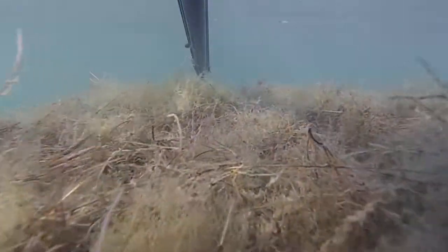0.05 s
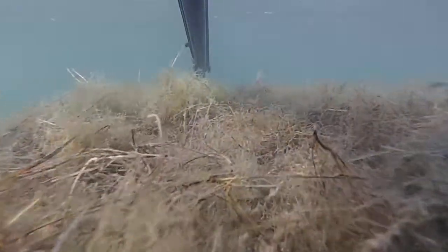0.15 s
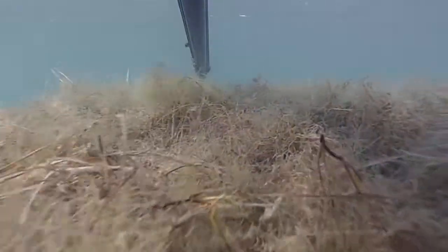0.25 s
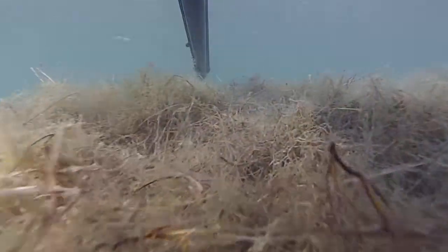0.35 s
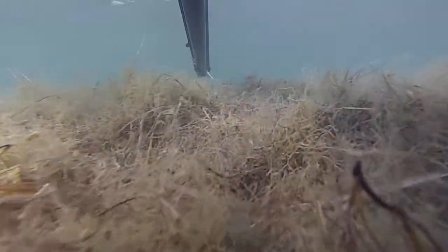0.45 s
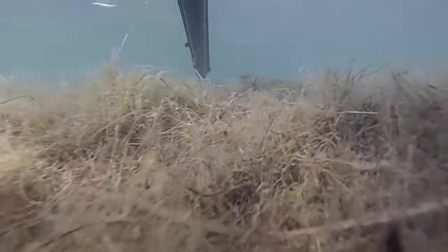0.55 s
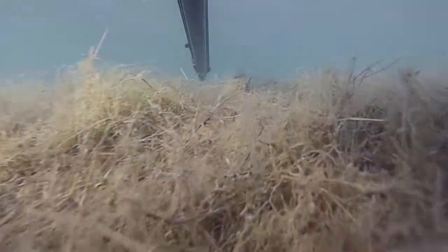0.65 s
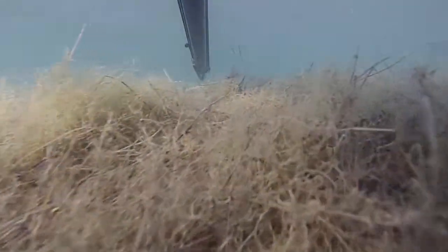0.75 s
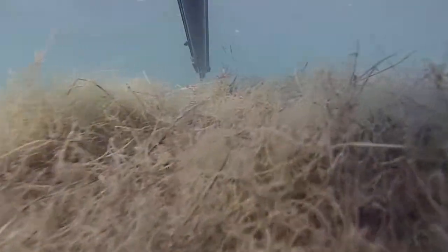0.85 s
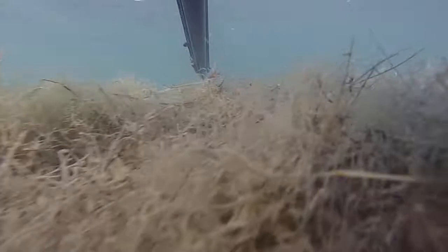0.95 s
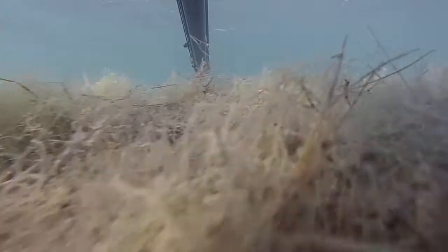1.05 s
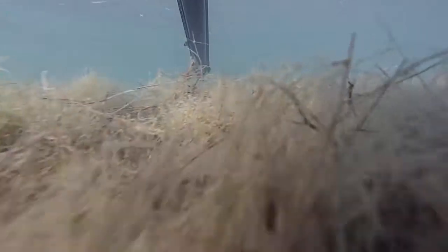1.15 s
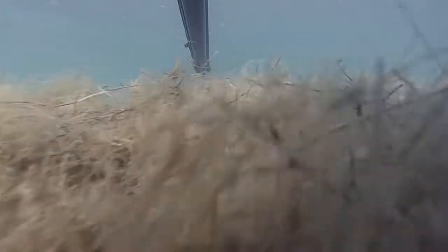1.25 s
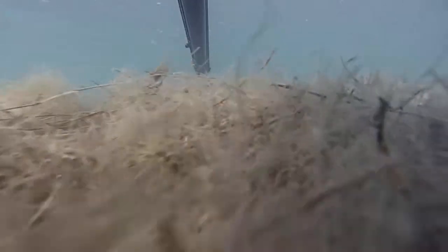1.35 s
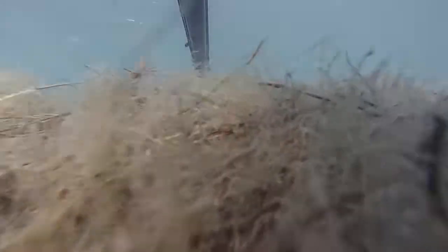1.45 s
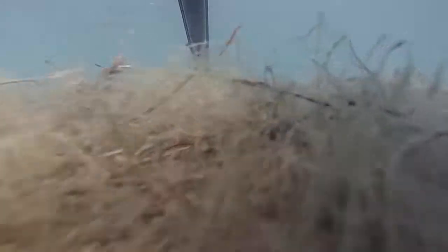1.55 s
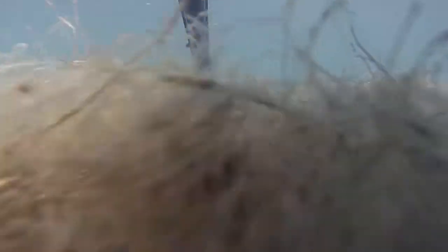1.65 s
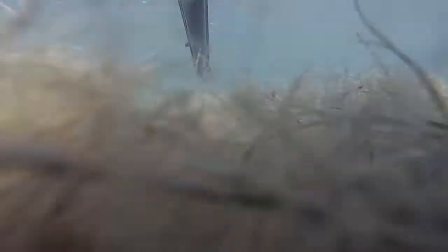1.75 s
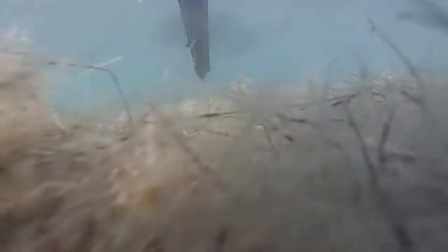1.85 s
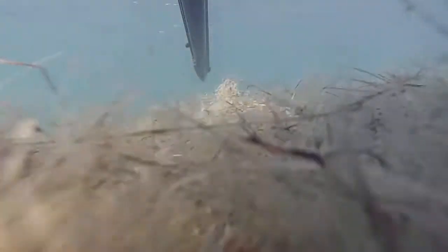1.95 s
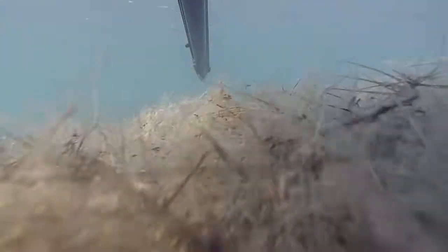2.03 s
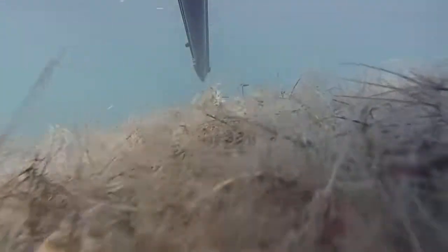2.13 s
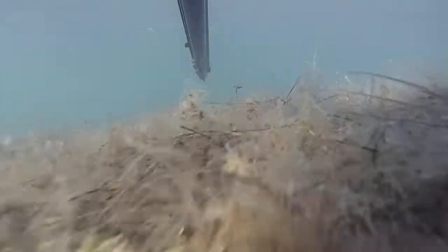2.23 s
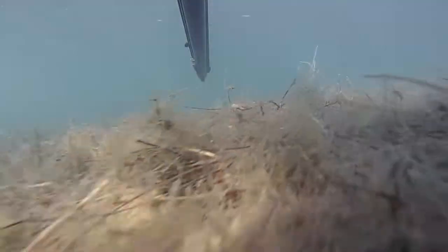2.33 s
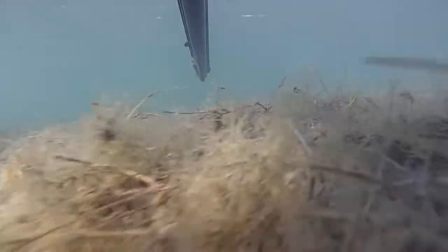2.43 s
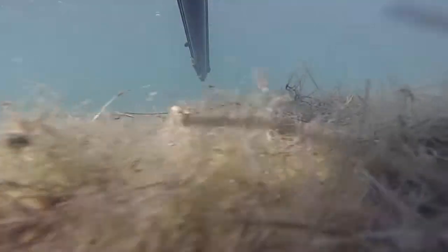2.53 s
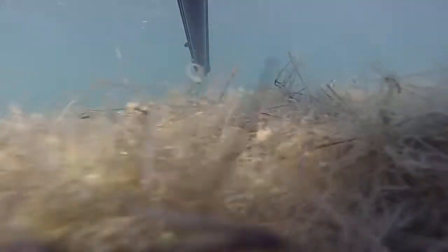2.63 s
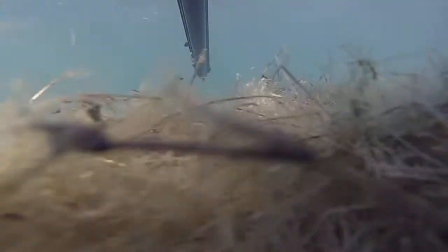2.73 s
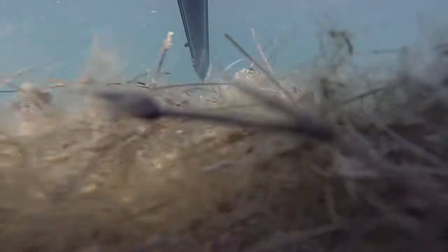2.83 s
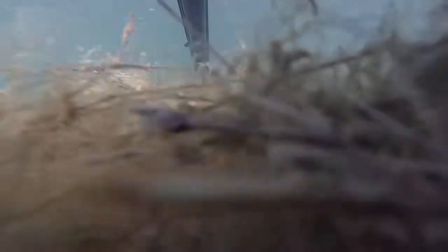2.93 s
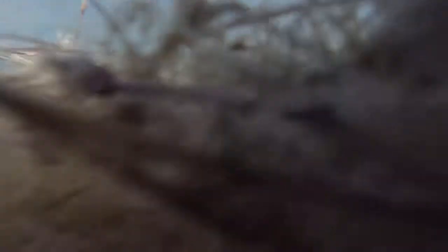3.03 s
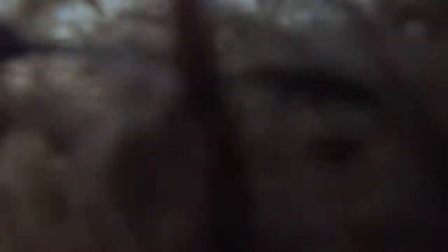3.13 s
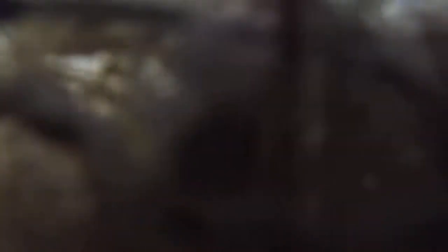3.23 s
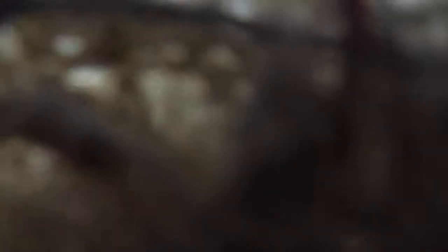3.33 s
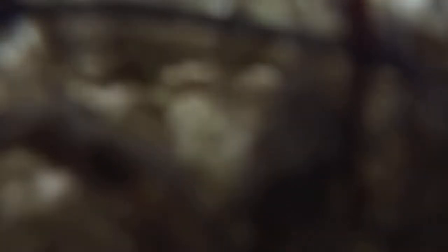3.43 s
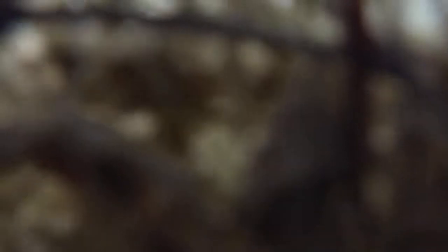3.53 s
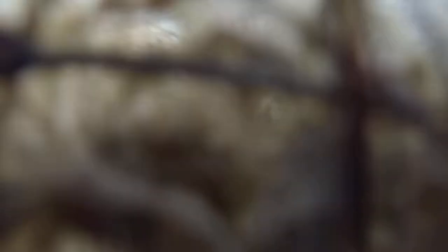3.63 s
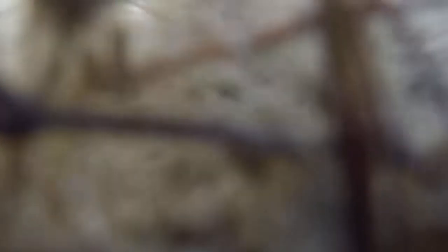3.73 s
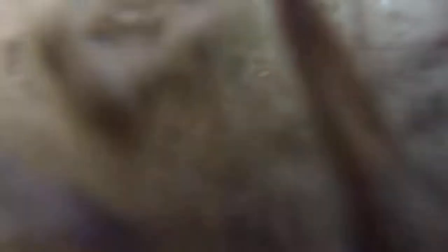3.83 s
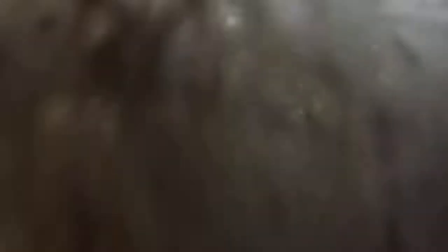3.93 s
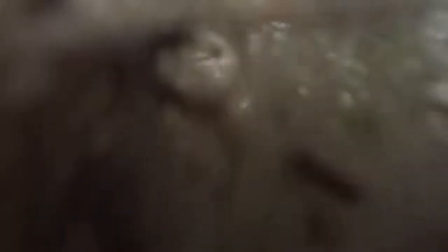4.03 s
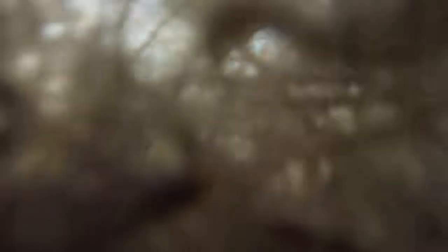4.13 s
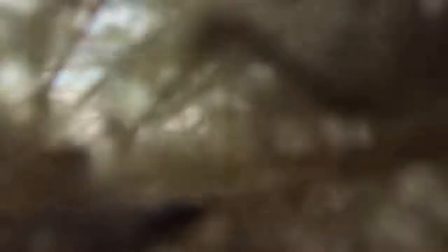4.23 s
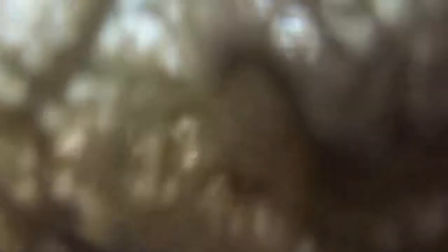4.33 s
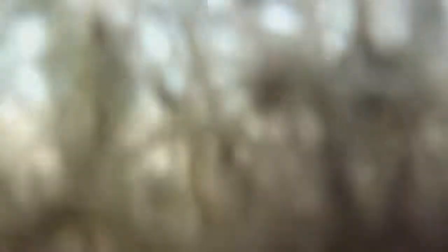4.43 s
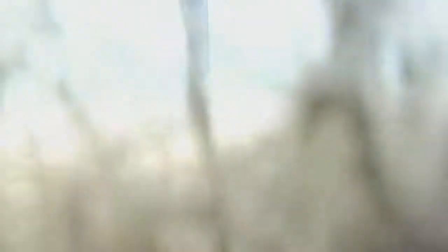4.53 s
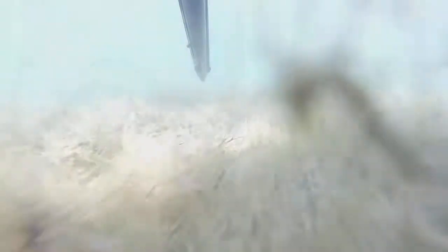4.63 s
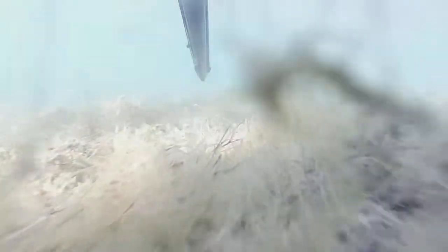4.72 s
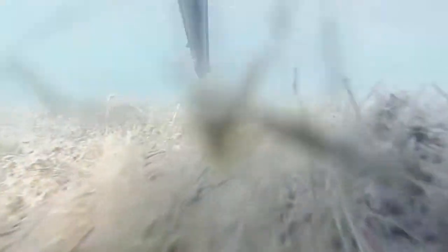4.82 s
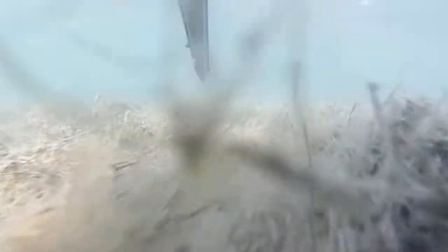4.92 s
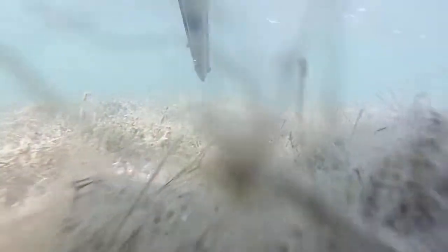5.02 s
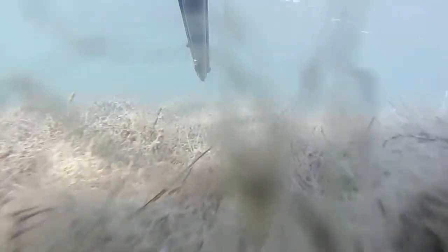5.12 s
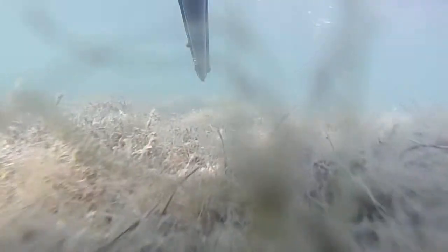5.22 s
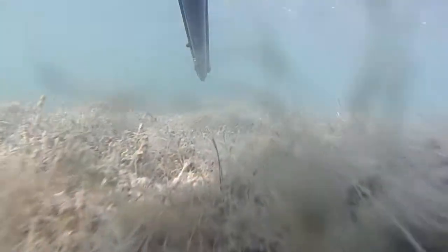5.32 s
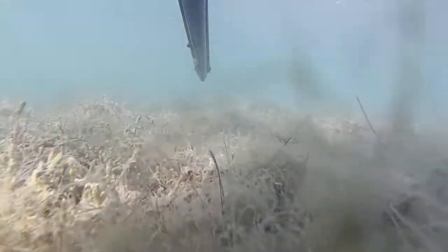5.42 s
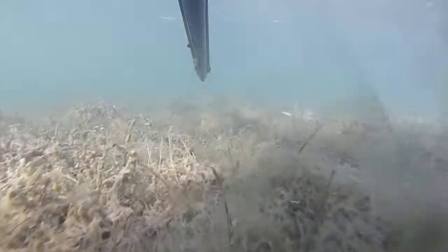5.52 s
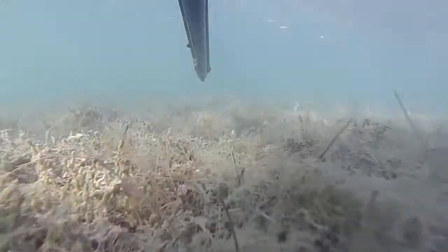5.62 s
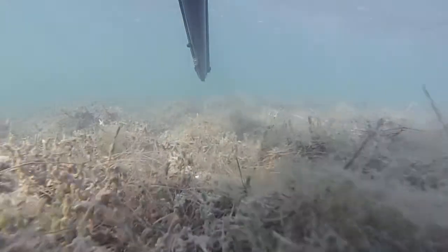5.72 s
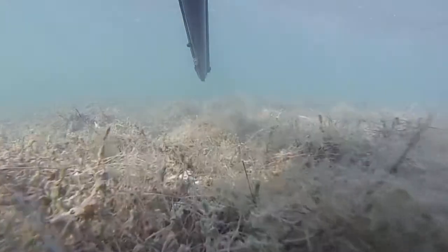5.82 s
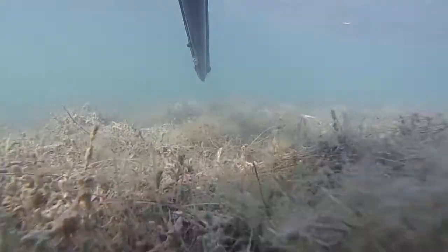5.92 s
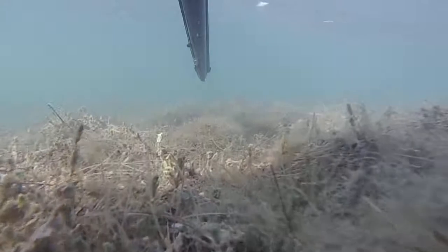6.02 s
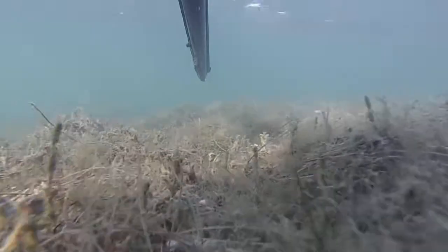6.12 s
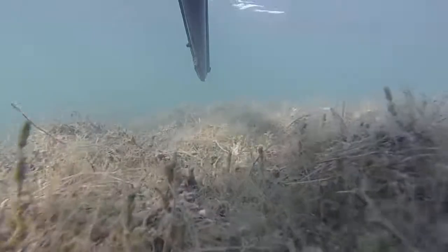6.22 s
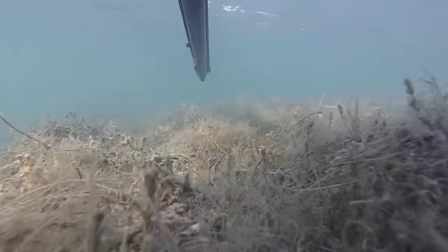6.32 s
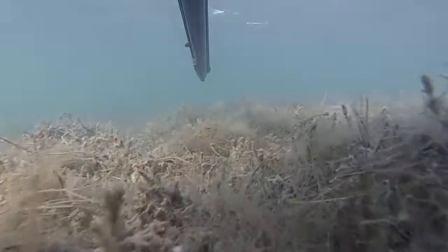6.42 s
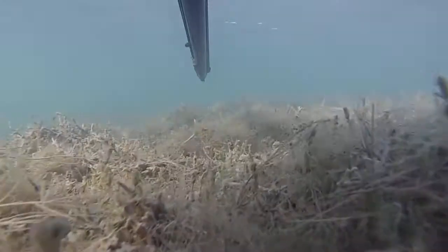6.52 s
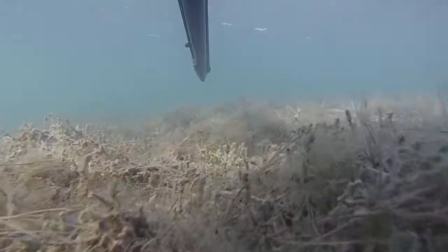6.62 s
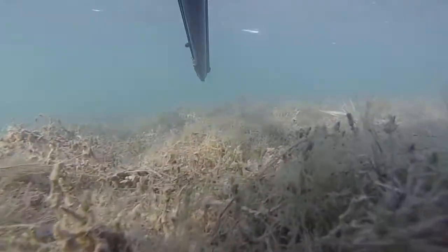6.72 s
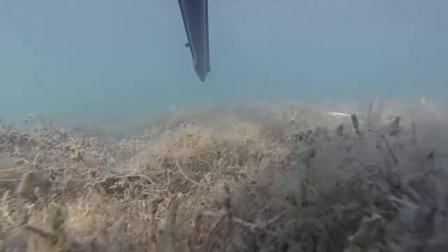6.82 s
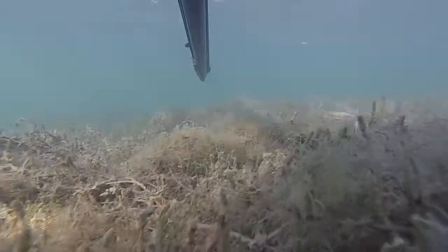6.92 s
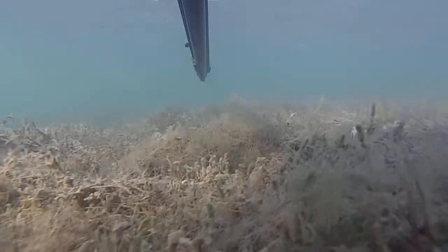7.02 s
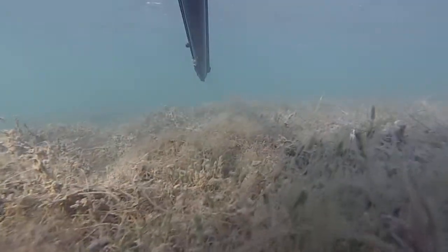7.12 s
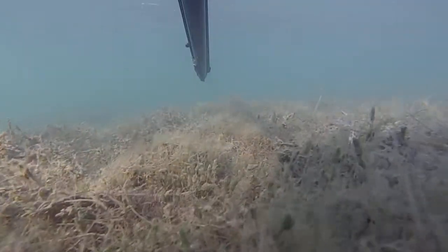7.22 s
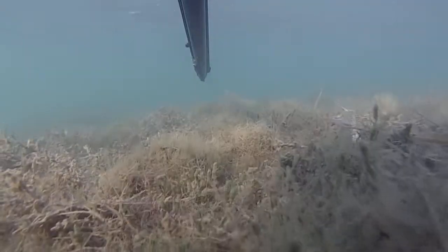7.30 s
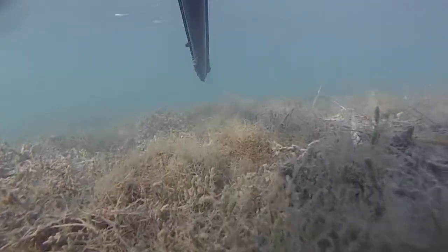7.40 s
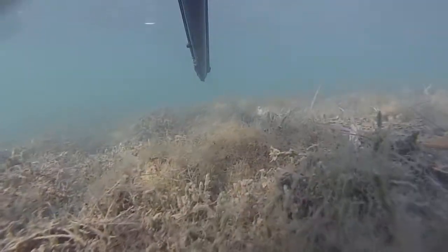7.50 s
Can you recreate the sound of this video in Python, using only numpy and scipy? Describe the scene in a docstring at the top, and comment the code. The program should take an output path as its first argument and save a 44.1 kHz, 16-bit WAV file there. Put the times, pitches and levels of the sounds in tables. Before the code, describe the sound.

Inside a camera housing pushed through shallow-water seaweed: faint fizzing bubbles and a humming drag, then a sharp knock. Low judders lead into dense rubbing, crackling twigs, hard knocks and dull thumps, heaviest around four seconds. It thins to a quiet low drag, then a bump rattles the frame near the end. The close, enclosed microphone makes everything muffled.

```python
"""A camera housing on a frame is pushed through seaweed in shallow water, heard from inside the housing.
Fronds, stalks and grit excite the shell by tiny slips and impulses; flow and blows shake the mount. Stick-slip
tones make most squeaks and the judders. A few bubbles fizz and ping at the start. The frame hums and chatters
where it drags along the bed, and rattles and shudders after bumps."""
import sys
import numpy as np
from scipy import signal
from scipy.fft import rfft, irfft
from scipy.io import wavfile
from scipy.ndimage import uniform_filter1d

SR = 44100
rng = np.random.default_rng(int(sys.argv[2]) if len(sys.argv) > 2 else 0)


def to_wav(s):
    """Save 16-bit WAV."""
    ch = np.atleast_2d(s).T  # columns
    pcm = np.round(np.clip(ch, -1, 1) * 32767)  # PCM
    wavfile.write(sys.argv[1], SR, pcm.astype(np.int16))


N = 333396
TIME = np.arange(N) / SR
FIRM_DB = -42   # weed pressure of an ordinary clump

# transmission through the shell wall: [f/Hz, relative level/dB per Hz]
WALL_SPECTRUM = [(120, 7.5), (250, 0.5), (480, -2), (700, 3.5), (1020, -0.5), (1350, -2.5), (1600, -1),
                 (2200, -3.5), (2600, -13), (3050, -11), (3700, -5.5), (4050, -29), (4400, -57),
                 (6000, -50)]
# the shell's treble: [f/Hz, relative level/dB per Hz]
TREBLE_SPECTRUM = [(3000, -3), (4400, -4), (4950, 4), (5800, -2.5), (6250, -1.5), (7000, -7.5), (7600, -4),
                   (8600, -13), (11800, -13), (12600, -14), (15500, -41)]


def from_db(db):
    """Amplitude ratio of a level in dB."""
    return 10 ** (np.asarray(db) / 20)


def rms_one(x):
    """Scale to rms 1."""
    return x / np.sqrt(np.mean(x ** 2) + 1e-20)


def peak_one(x):
    """Scale to peak 1."""
    return x / (np.abs(x).max() + 1e-20)


def in_time(rows):
    """A curve of (t/s, value) at every sample."""
    t_s, value = np.transpose(rows)
    return np.interp(TIME, t_s, value)


def add(out, t_s, sound):
    """Mix a sound in at time t_s."""
    i = max(0, round(t_s * SR))
    out[i:i + len(sound)] += sound[:max(0, N - i)]


def swell(t_s, rise_s, fall_s):
    """Bell of height 1 at t_s, with a 1/e width for either side."""
    width_s = np.where(TIME < t_s, rise_s, fall_s)
    return np.exp(-np.minimum(((TIME - t_s) / width_s) ** 2, 60))


def drift(rate_hz):
    """Slow chance of spread 1: noise through two equal poles, run at SR / 40."""
    pole = np.exp(-80 * np.pi * rate_hz / SR)
    noise = rng.standard_normal(N // 40 + 2002)
    slow = signal.lfilter([1], [1, -2 * pole, pole * pole], noise)[2000:]
    return np.interp(np.arange(N) / 40, np.arange(len(slow)), rms_one(slow))


def cut(x, hz, kind, order=2):
    """Low-pass or high-pass."""
    sos = signal.butter(order, min(hz, SR / 2 - 1000), kind, fs=SR, output="sos")
    return signal.sosfilt(sos, x)


def response(spectrum, size=8192):
    """The causal (minimum-phase) impulse response of a body with this spectrum."""
    hz, db = np.transpose(spectrum)
    bins_hz = np.arange(size // 2 + 1) * SR / size
    log_gain = np.log(from_db(np.interp(np.log(bins_hz + 1), np.log(hz), db)))
    cepstrum = irfft(log_gain)[:size // 2]
    return irfft(np.exp(rfft(np.r_[cepstrum[0], 2 * cepstrum[1:]], size)))


def colour(x, spectrum):
    """Pass a steady excitation through a body; rms 1."""
    return rms_one(signal.oaconvolve(x, response(spectrum))[:N])


def evened(x, share, size):
    """Take out a share of a noise's slow swings in level; rms 1."""
    power = np.abs(uniform_filter1d(x ** 2, size=size)) + 1e-9
    return rms_one(x / power ** (share / 2))


def ringing(modes, size=8192):
    """Sum of decaying sines, one per mode."""
    t = TIME[:size]
    return sum(from_db(db - 60 * t / t60_s) * np.sin(2 * np.pi * hz * t) for hz, db, t60_s in modes)


def slips(per_s, spread_db):
    """Tiny stick-slip releases at random moments, a few much larger than the rest; rms 1."""
    sizes = from_db(spread_db * np.minimum(rng.exponential(1, N), 5))
    signed = sizes * rng.choice([-1, 1], N)
    return rms_one(signed * (rng.random(N) < per_s / SR))


def slip_phase(t_s, hz, glide_oct_per_s, wander_oct):
    """Phase of a wavering stick-slip tone that glides through its pitch at t_s."""
    octaves = glide_oct_per_s * np.clip(TIME - t_s, -.06, .06) + wander_oct
    return 2 * np.pi * np.cumsum(hz * 2 ** octaves) / SR


def shell_click(treble_db):
    """What one sharp impulse on the outside becomes inside the shell."""
    return response(WALL_SPECTRUM) + from_db(treble_db) * response(TREBLE_SPECTRUM)


def flow(current_db=-50.5):
    """Eddies keep the mount rocking gently; clinging weed tugs it onto its low resonances in uneven heaves."""
    # open-water current: [f/Hz, relative level/dB per Hz]
    current_spectrum = [(20, -11.5), (42, 8.5), (57, 1.5), (70, -0.5), (95, 0), (180, -17), (800, -88)]
    # rocking mount: [f/Hz, relative level/dB per Hz]
    rocking_spectrum = [(25, -21.5), (40, 2), (57, 11.5), (76, -4), (98, 1), (120, -5), (142, -12.5),
                        (175, -10), (260, -19.5), (700, -41.5), (2000, -97.5)]
    # tug of the weed, as rocking level: [t/s, level/dB]
    tug_db = [(1.35, -48), (1.5, -40), (1.82, -27.5), (2.1, -34.5), (2.35, -42.5), (2.95, -45), (3.13, -35),
              (3.45, -36), (3.95, -23.5), (4.2, -26), (4.65, -26.5), (4.85, -37), (5.2, -40.5),
              (5.75, -51.5)]
    current = from_db(current_db) * colour(rng.standard_normal(N), current_spectrum)
    rocking = evened(colour(rng.standard_normal(N), rocking_spectrum), share=0.89, size=8820)
    return current + from_db(in_time(tug_db)) * rocking


def snags(per_s, release_s):
    """Sudden bursts that die away; mean 1."""
    catches = np.abs(slips(per_s, spread_db=5.5))
    bursts = signal.lfilter([1], [1, -np.exp(-1 / (release_s * SR))], catches + 1e-12)
    return bursts / bursts.mean()


def rubbing(clump_db, snag_share):
    """Dense slips that come in clumps; now and then a frond catches and lets go in a burst."""
    clumps = from_db(clump_db * drift(rate_hz=30))
    grip = clumps * (1 + snag_share * snags(per_s=130, release_s=0.0042))
    return grip * slips(per_s=2000, spread_db=1.5)


def fronds(pressure_db, body_db=-1.5, firm_treble_db=-20.5, split_hz=1300, smooth_share=0.81):
    """Limp fronds rub low, wiry ones high; the wall passes mostly what lies under 4 kHz."""
    dulling_db_per_db = 0.2027   # more pressure mats the fronds
    treble_db = firm_treble_db - dulling_db_per_db * (pressure_db - FIRM_DB)
    limp = rubbing(clump_db=0.75, snag_share=0.21)
    wiry = rubbing(clump_db=0.9, snag_share=0.21)
    mixed = cut(limp, split_hz, "low") + cut(wiry, split_hz, "high")
    body = from_db(body_db) * colour(mixed, WALL_SPECTRUM)
    fine = wiry + smooth_share * rng.standard_normal(N)   # fine hairs add a smooth hiss
    treble = from_db(treble_db) * colour(fine, TREBLE_SPECTRUM)
    return from_db(pressure_db) * (body + treble)


def crackles(pressure_db, level_db=-5.5, per_s=120.0, cycles=8.0, cluster_db=1.6, low_hz=620, high_hz=3300):
    """Twigs of different thickness flick across the shell, each size in its own clusters and pitch."""
    flicks = 0
    for hz in np.geomspace(low_hz, high_hz, num=9):
        clusters = from_db(cluster_db * np.minimum(drift(rate_hz=19), 1.5))
        catches = slips(per_s, spread_db=2.0) * clusters
        ring = ringing([(hz, 0, cycles / hz)], size=2048)
        flicks = flicks + rms_one(signal.oaconvolve(catches, ring)[:N])
    return from_db(pressure_db + level_db) * colour(flicks, WALL_SPECTRUM)


def grit(pressure_db, level_db=-16.0, treble_db=-14.0):
    """Small hard bits carried in the weed tap the shell at random."""
    taps = signal.oaconvolve(slips(per_s=35, spread_db=1.5), shell_click(treble_db))[:N]
    return from_db(pressure_db + level_db) * rms_one(taps)


def bubbles(per_s=27.0, cycles=31.0, low_hz=1150, high_hz=2550):
    """A trickle fizzes, then fades: each bubble rings briefly at the pitch set by its size."""
    level_db, end_s, fade_db_per_s = -60.5, 0.45, 103.5
    pings = 0
    for hz in np.geomspace(low_hz, high_hz, num=12):
        ring = ringing([(hz, 0, cycles / hz)])
        pings = pings + rms_one(signal.oaconvolve(slips(per_s, spread_db=5.0), ring)[:N])
    return from_db(level_db - fade_db_per_s * np.maximum(TIME - end_s, 0)) * rms_one(pings)


def dragging(uneven_db=0.5):
    """Load of the frame on the uneven bed, and its shudder: each drag builds to a peak, eases, lifts off."""
    # drags on the bed: [touch t/s, peak t/s, lift-off t/s, level/dB, shudder re drag/dB]
    drag_events = [(0, 0.185, .9, -50.5, 2), (5.3, 5.55, 6.14, -52.5, -8), (5.927, 6.25, 6.66, -47, -8.5),
                   (7.06, 7.1, 7.2, -62.5, 11.5), (7.204, 7.41, 7.85, -46, -5)]
    lean_db_per_s, lift_db_per_s = 25, 126   # easing about the peak; extra loss out of contact
    load, shake = 0, 0
    for touch_s, peak_s, lift_s, db, shudder_db in drag_events:
        clear_s = np.maximum(touch_s - TIME, 0) + np.maximum(TIME - lift_s, 0)
        drag = from_db(db - lean_db_per_s * np.abs(TIME - peak_s) - lift_db_per_s * clear_s)
        load = load + drag
        shake = shake + from_db(shudder_db) * drag
    return from_db(uneven_db * drift(rate_hz=17.0)) * np.array([load, shake])


def frame(pressure_db, shudder_db=7.0, rattle_db=5.0):
    """Bed and weed excite resonances near 700 Hz; bumps add a ragged dying rattle and a low shudder."""
    # bumps on the bed: [t/s, level before cushioning/dB, 1/e decay/s]
    bump_events = [(1.425, -40, 0.095), (7.212, -26.5, 0.014), (7.245, -32, 0.09), (7.486, -47, 0.02)]
    # frame resonances: [f/Hz, relative level/dB per Hz]
    hum_spectrum = [(250, -33.5), (480, -11.5), (590, -1), (720, 4), (800, -.5), (870, -19), (1000, -30),
                    (1550, -22.5), (1690, -19.5), (1780, -27.5), (2800, -29.5), (4000, -47), (12000, -57)]
    # low shudder: [f/Hz, relative level/dB per Hz]
    shudder_spectrum = [(40, -12), (105, 14.5), (140, 9.5), (170, 11), (230, -2), (300, -9.5), (480, -7.5),
                        (1000, -89.5)]
    weed_hum_db, hum_db_per_db = -55, 1.5   # in an ordinary clump; growth with weed pressure
    drag, shake = dragging()
    blows = 0
    for t_s, db, decay_s in bump_events:
        blows = blows + from_db(db) * (TIME >= t_s) * np.exp(-np.abs(TIME - t_s) / decay_s)
    blows = cut(blows + 1e-12, hz=149, kind="low")   # the soft bed cushions each blow
    rattle = blows * from_db(rattle_db * np.minimum(drift(rate_hz=28), 1))
    hum = evened(colour(slips(per_s=6000, spread_db=3.5), hum_spectrum), share=0.13, size=2205)
    shudder = evened(colour(rng.standard_normal(N), shudder_spectrum), share=0.55, size=1100)
    weed_hum = from_db(weed_hum_db + hum_db_per_db * (pressure_db - FIRM_DB))
    rub = np.hypot(drag, weed_hum)
    return (rub + rattle) * hum + (shake + from_db(shudder_db) * blows) * shudder


def scrapes(treble_db=-22.0, span=3.36, fall_share=0.59):
    """A stiff stem rasps past in a short run of slips, under two octaves wide; thinner stems sound higher."""
    # single stems: [peak t/s, 1/e rise/s, level/dB, lowest f/Hz]
    scrape_events = [(.04, 0.053, -51.5, 3100), (2.162, .015, -51, 5470), (2.418, 0.03, -45.5, 2050),
                     (2.423, 0.0097, -47.5, 6500), (2.444, 0.0093, -49, 5800), (2.476, 0.0077, -42, 1000),
                     (2.497, 0.0058, -43, 3000), (2.8, 0.096, -47, 3740), (2.709, 0.0051, -38.5, 1000),
                     (2.8072, 0.0014, -27.5, 1400), (2.811, 0.04, -39, 1440), (2.866, 0.01, -45.5, 2190),
                     (3.047, 0.019, -46, 3000), (3.806, 0.0052, -30, 1060), (3.882, 0.018, -34.5, 700),
                     (3.875, 0.024, -52, 6000), (3.985, 0.0072, -31, 700), (4.67, 0.055, -52, 4000),
                     (5.256, 0.019, -34.5, 684), (5.286, 0.023, -33.5, 1490), (5.292, 0.023, -40, 3500),
                     (5.31, 0.0015, -29, 990), (5.325, 0.0095, -38.5, 1200), (5.555, 0.019, -52, 890),
                     (7.251, 0.018, -40.5, 700), (7.286, 0.021, -51.5, 2290), (7.39, 0.049, -64.5, 2290),
                     (7.457, 0.0025, -44, 2390), (7.471, 0.0074, -53, 2300), (7.52, 0.056, -59, 1130)]
    catching = from_db(3.1 * drift(rate_hz=76))
    rasp = signal.oaconvolve(catching * slips(per_s=6500, spread_db=1.5), shell_click(treble_db))[:N]
    out = np.zeros(N)
    for t_s, rise_s, db, hz in scrape_events:
        band = cut(cut(rasp, hz, "high", order=3), span * hz, "low")
        passing = swell(t_s, rise_s, fall_share * rise_s)   # lets go faster than it catches
        out += from_db(db) * passing * rms_one(band)
    return out


def knocks(pressure_db, scatter_db=-23.5, scatter_s=0.0055, treble_db=-17.0, firm_hz=3000, thin_share=0.11):
    """Wall crack, reflections and short ring; soft contacts are dull and full, hard ones thin and snappy."""
    # stalks and grit on the shell: [t/s, peak level/dB, contact hardness f/Hz]
    knock_events = [(0.1183, -28, 1150), (0.6779, -13, 2060), (0.7, -29.5, 1600), (0.7275, -31.5, 1000),
                    (0.7544, -18, 3170), (.845, -38, 700), (1.421, -27.5, 13000), (1.7104, -25.5, 1970),
                    (1.7413, -30, 2500), (1.827, -23, 5000), (1.835, -19.5, 2000), (1.959, -27.5, 9300),
                    (2.0382, -28, 2830), (2.207, -33, 2200), (2.328, -33, 1800), (2.352, -28, 2200),
                    (2.3682, -31.5, 2000), (1.608, -29, 2600), (2.7023, -24.5, 2800), (2.789, -33, 3020),
                    (3.2041, -23, 3250), (3.2532, -31, 2000), (3.4934, -18.5, 3600), (3.558, -23.5, 3500),
                    (3.6033, -14.5, 3600), (3.7137, -35, 2400), (3.8425, -21, 3200), (3.872, -17.5, 2600),
                    (4.0093, -16.5, 3050), (4.0581, -29, 2500), (4.2056, -22.5, 4500), (4.278, -18.5, 1280),
                    (4.5764, -19, 1490), (4.61, -18.5, 2000), (4.6884, -23, 5200), (5.0662, -18, 4080),
                    (5.0802, -18, 1510), (5.1749, -22, 1440), (5.3305, -27, 2600), (5.58, -32, 2000)]
    # shell modes: [f/Hz, relative level/dB, t60/s]
    shell_modes = [(700, -15.5, 0.068), (870, -13, 0.033), (1350, -21, 0.037), (1600, -6.5, 0.023),
                   (2050, -15, 0.023)]
    # snap of a hard contact: [f/Hz, relative level/dB, t60/s]
    snap_modes = [(3100, -2, 0.0021)]
    ring_db_per_db, ring_floor_db = 0.6, -56   # the ring's share rises with weed pressure above the floor
    out, t = np.zeros(N), TIME[:2048]
    ring, snap = ringing(shell_modes, size=len(t)), ringing(snap_modes, size=len(t))
    for t_s, db, hard_hz in knock_events:
        hardness = hard_hz / firm_hz
        wall = shell_click(treble_db + 20 * np.log10(hardness))
        reflections = from_db(scatter_db) * rng.standard_normal(len(t)) * np.exp(-t / scatter_s)
        struck = signal.fftconvolve((t == 0) + reflections, wall)[:len(t)]
        crack = peak_one(cut(struck, thin_share * hard_hz, "high"))
        ring_db = ring_db_per_db * max(pressure_db[round(t_s * SR)] - ring_floor_db, 0)
        ring_gain = from_db(ring_db) / np.sqrt(2 * hardness)
        knock = crack + ring_gain * ring + min(hardness, 1) ** 4 * snap
        add(out, t_s, from_db(db) * peak_one(cut(knock, hard_hz, "low", order=3)))
    return out


def squeaks(waver_oct=0.069, rough_db=3.5):
    """Wet stems stick and slip much faster than a judder: a brief, rough whistle. The first two, near the
    start, are bubbles pinging."""
    # squeaks (the first two rows are bubbles): [peak t/s, 1/e half-width/s, level/dB, f/Hz, glide/octaves per
    # s]
    squeak_events = [(0.318, 0.0016, -45, 2420, -11), (0.515, .002, -48, 1720, -2),
                     (2.419, 0.0051, -34, 2185, 9.5), (2.441, .004, -50, 4300, -18),
                     (2.446, 0.0026, -40, 2120, -10), (4.208, 0.0022, -32, 2074, -3),
                     (7.24, 0.0033, -31.5, 1625, 2), (7.46, 0.0028, -47, 2790, -11),
                     (7.472, 0.006, -52, 2650, -0.5)]
    wander = waver_oct * drift(rate_hz=48.0)
    grip = from_db(rough_db * drift(rate_hz=100))
    whistles = np.zeros(N)
    for t_s, half_s, db, hz, glide in squeak_events:
        whistles += from_db(db) * swell(t_s, half_s, half_s) * np.sin(slip_phase(t_s, hz, glide, wander))
    return grip * whistles


def judders(waver_oct=0.0783, overtone_share=0.47):
    """A stalk sticks and slips 100-170 times/s; a rougher grip adds overtones and a churn outlasting the tone."""
    # rubbery stalks: [peak t/s, 1/e half-width/s, tone level/dB, f/Hz, glide/octaves per s]
    judder_events = [(0.728, 0.015, -27, 96, -0.5), (0.873, 0.0067, -32, 119.2, -12),
                     (1.189, 0.039, -21, 106.8, -3), (1.456, 0.01, -21, 107.5, 5.5),
                     (1.487, 0.019, -16, 163.5, -3.5), (1.518, 0.019, -12.5, 122.5, -2.5),
                     (4.396, 0.022, -9, 108.3, -10.5), (7.259, 0.0092, -16.5, 174.4, 0)]
    # rough part: [f/Hz, relative level/dB per Hz]
    churn_spectrum = [(70, -32), (130, 31.5), (220, 5.5), (380, 3.5), (470, -12), (720, -13), (1500, -77)]
    # roughness re tone, constant up to clean_above_db; a firmer grip is cleaner
    max_rough_db, clean_above_db, cleaning_db_per_db = -14.5, -20.5, 3
    out, wander = np.zeros(N), waver_oct * drift(rate_hz=35.8)
    churn = evened(colour(slips(per_s=880, spread_db=4.5), churn_spectrum), share=0.82, size=1100)
    for t_s, half_s, db, hz, glide in judder_events:
        phase = slip_phase(t_s, hz, glide, wander)
        grip = swell(t_s, half_s, half_s)
        overtones = overtone_share * (np.sin(2 * phase) + np.sin(3 * phase) / 2)
        rough = overtones + churn / (grip + 0.068)
        rough_db = max_rough_db - cleaning_db_per_db * max(db - clean_above_db, 0)
        out += from_db(db) * grip * (np.sin(phase) + from_db(rough_db) * rough)
    return out


def thumps(push_share=0.84):
    """A soft push bends the mount, which then swings back on its modes."""
    # dull blows: [t/s, peak level/dB, push length/s]
    thump_events = [(0.757, -30.5, 0.0054), (1.746, -16.5, 0.0022), (1.801, -18, 0.0036),
                    (1.841, -12.5, 0.004), (3.256, -23.5, 0.0038), (3.499, -17.5, 0.004),
                    (3.696, -19.5, 0.0035), (3.847, -16.5, 0.0095), (3.985, -10, 0.0041),
                    (4.153, -18, 0.0051), (4.264, -18, 0.005), (4.69, -17.5, 0.011), (5.091, -30.5, 0.0038),
                    (7.208, -16.5, 0.0029), (7.246, -15.5, 0.0068), (7.2539, -9.5, 0.0046),
                    (7.297, -31, 0.0027)]
    # mount modes: [f/Hz, relative level/dB, t60/s]
    mount_modes = [(58.9, 10.5, 0.3), (101.1, 9.5, 0.15), (169, -2.5, 0.087)]
    out = np.zeros(N)
    for t_s, db, length_s in thump_events:
        push = np.sin(np.pi * np.minimum(TIME[:SR // 20] / length_s, 1)) ** 2
        swing = peak_one(signal.fftconvolve(push, ringing(mount_modes)))
        add(swing, 0, push_share * push)
        add(out, t_s, from_db(db) * peak_one(swing))
    return out


def chatters(waver_oct=0.0342, upper_hz=1690, upper_db=-28.0):
    """The frame catches on the bed and rings briefly near its main resonance, with a faint upper mode."""
    # chatters: [peak t/s, 1/e half-width/s, level/dB, f/Hz]
    chatter_events = [(1.442, 0.0073, -35, 729), (1.475, 0.017, -37, 720), (5.514, 0.007, -40.5, 760),
                      (5.585, 0.0068, -41, 720), (7.215, 0.0055, -31, 715), (7.254, 0.0052, -30.5, 800),
                      (7.297, 0.007, -38, 700), (7.312, 0.0054, -24, 715), (7.34, 0.0055, -37, 750),
                      (7.35, 0.0061, -30.5, 690), (7.379, 0.008, -36, 750), (7.451, 0.0044, -35.5, 680),
                      (7.456, 0.0026, -33, 800), (7.49, 0.0059, -33.5, 750)]
    wander = waver_oct * drift(rate_hz=46.5)
    upper = from_db(upper_db) * np.sin(slip_phase(0, upper_hz, 0, wander / 2))
    out = np.zeros(N)
    for t_s, half_s, db, hz in chatter_events:
        tone = np.sin(slip_phase(t_s, hz, 0, wander)) + upper
        out += from_db(db) * swell(t_s, half_s, half_s) * tone
    return out


def hiss(level_db=-63):
    """Faint steady coloured noise."""
    # hiss: [f/Hz, relative level/dB per Hz]
    hiss_spectrum = [(100, 2.5), (300, 7.5), (1000, 1), (2000, -2), (4000, -7.5), (8000, -14), (12000, -19),
                     (15500, -27.5)]
    return from_db(level_db) * colour(rng.standard_normal(N), hiss_spectrum)


def scene():
    """Weed pressure drives the rubbing; all reaches one microphone inside the housing, over a faint hiss."""
    # weed pressure on the housing, as reference level of its rubbing: [t/s, level/dB]
    pressure_curve = [(0.0, -53.5), (1.05, -71.5), (1.46, -41), (1.67, -42.5), (1.73, -37), (2.15, -39.5),
                      (2.24, -47), (2.47, -51), (2.55, -52), (2.7, -43.5), (3.33, -38), (3.48, -42),
                      (3.95, -31.5), (4.18, -38), (4.65, -34), (4.77, -43.5), (5.16, -52.5), (5.23, -46),
                      (5.41, -57.5), (6.0, -72)]
    pressure_db = in_time(pressure_curve)
    weed = fronds(pressure_db) + crackles(pressure_db) + grit(pressure_db)
    stalks = scrapes() + knocks(pressure_db) + squeaks() + judders()
    mount = flow() + thumps()
    bed = frame(pressure_db) + chatters()
    return (weed + stalks + mount + bed + bubbles() + hiss())[None]


def record(dry, cutoff_hz=15300):
    """The deepest bass and the top are cut."""
    thinned = cut(dry, hz=12.0, kind="high")
    sos = signal.ellip(12, .1, 80, cutoff_hz, fs=SR, output="sos")   # 0.1 dB ripple, 80 dB stop band
    return signal.sosfilt(sos, thinned)


dry = scene()
out = record(dry)
to_wav(out)
```